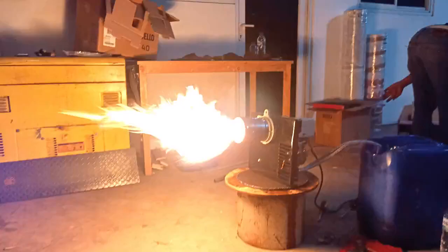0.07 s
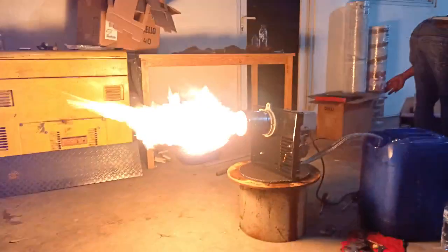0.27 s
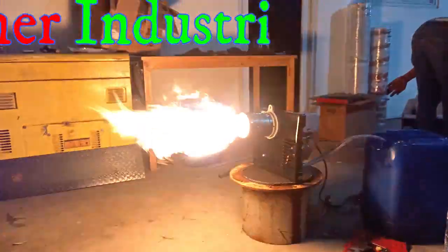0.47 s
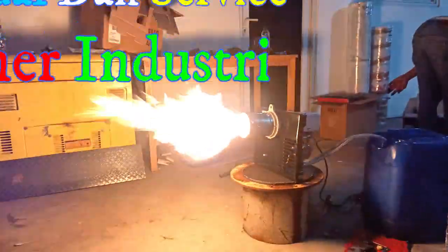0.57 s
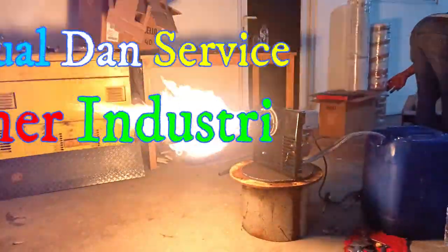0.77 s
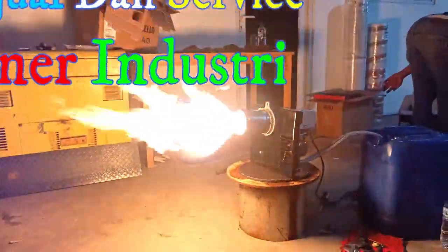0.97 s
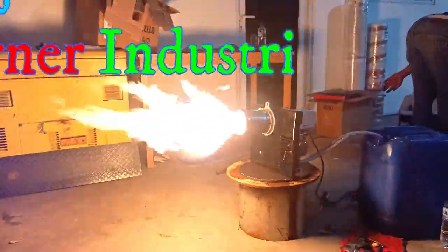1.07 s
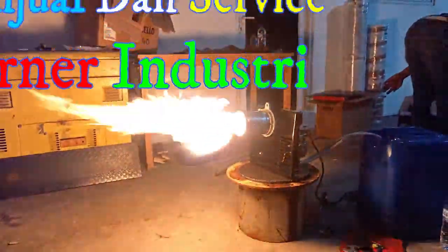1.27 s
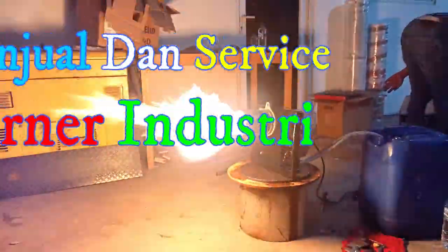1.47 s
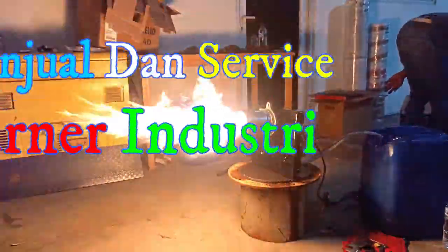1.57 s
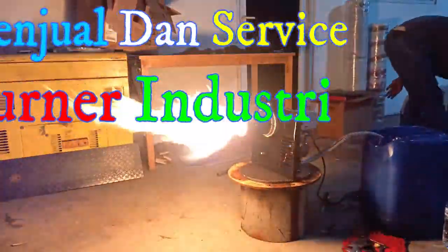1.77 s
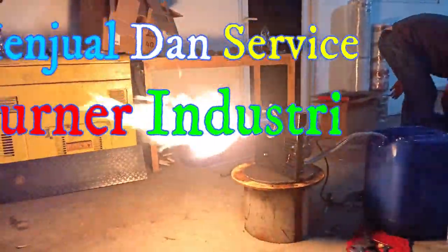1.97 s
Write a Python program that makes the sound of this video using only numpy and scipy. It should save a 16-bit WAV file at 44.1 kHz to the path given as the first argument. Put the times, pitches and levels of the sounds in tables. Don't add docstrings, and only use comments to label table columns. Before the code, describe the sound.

An oil burner roars into open air in a workshop. Silence until about 0.1 s, then the sound fades in, near full by 0.5 s, and creeps slightly louder until cutting off at 2 s. Deep combustion rumble dominates, with a low howl wandering in pitch and uneven surges, notably around 0.95 and 1.15 s. Rough mid-range flame noise, diffuse fan air, soft hiss and faint wavering machine tones fill in behind, with short room reverberation and dulled highs.

```python
import sys
import numpy as np
from scipy import signal
from scipy.fft import rfft, irfft
from scipy.io import wavfile
from scipy.ndimage import uniform_filter1d

SR = 44100
rng = np.random.default_rng(int(sys.argv[2]) if len(sys.argv) > 2 else 0)


def wrap_up_sound(samples):
    columns = np.atleast_2d(samples).T
    tamed = np.clip(columns, -1, 1)
    steps = np.round(tamed * 32767).astype(np.int16)
    wavfile.write(sys.argv[1], SR, steps)


def gain_from_db(level_db):
    decades = np.asarray(level_db, float) / 20
    return 10 ** decades


N = 89214


def evened(x):
    return x / np.sqrt(np.mean(x ** 2) + 1e-20)


def read(points, hz):
    f, value = np.transpose(points)
    return np.interp(np.log(hz + 1), np.log(f + 1), value)


def bump(hz, centre_hz, width_hz):
    return 1 / (1 + (2 * (hz - centre_hz) / width_hz) ** 2)


def lumps(table, hz):
    return sum(db * np.exp(-(2 * (hz - f) / w) ** 2) for f, w, db in table)


def shaped(x, gain):
    return irfft(rfft(x, N) * gain(np.fft.rfftfreq(N, 1 / SR)), N)


def delayed(hz, seconds):
    return np.exp(-2j * np.pi * hz * seconds)


def turbulence(size, channels, patch_db, flicker_db):
    hop = size // 4
    frames, bins = N // hop + 5, size // 2 + 1
    real, imaginary = rng.standard_normal((2, channels, bins, frames))
    patches = uniform_filter1d(rng.standard_normal((frames, bins)), size=10, axis=0)
    patches = evened(uniform_filter1d(patches, size=6, axis=1)).T
    flicker = evened(uniform_filter1d(rng.standard_normal(frames), size=3))
    z = (real + 1j * imaginary) * gain_from_db(patch_db * patches + flicker_db * flicker)
    return signal.istft(z, nperseg=size, noverlap=size - hop)[1][:, :N]


STEADY_S, STEADY_SHARE = 0.14, 0.8


def steadied(x):
    span = int(STEADY_S * SR / 2)
    power = uniform_filter1d(uniform_filter1d(evened(x) ** 2, span), span)
    return evened(x / (power + 0.058) ** (STEADY_SHARE / 2))


# time in seconds, swell in dB.
FLAME_SWELL = [(.12, -4), (.3, 2), (.42, 0.5), (.54, 1), (.6, -1.5), (.76, 1), (.8, 0), (0.891, -1),
               (.95, 2.5), (1.07, -2.5), (1.14, 2), (1.298, -0.5), (1.418, 0.5), (1.58, 0), (1.721, 0.5),
               (1.801, -1.5), (1.87, 0.5), (2.0, -1.5)]


def swell(share):
    s, db = np.transpose(FLAME_SWELL)
    return gain_from_db(share * np.interp(np.arange(N) / SR, s, db))


ROOM_T60_S, ROOM_DB = 0.37, -3.5


def room(x):
    t = np.arange(SR // 2) / SR
    taps = rng.standard_normal((2, len(t))) * gain_from_db(-60 * t / ROOM_T60_S)
    taps = taps * (t > 0.004)
    tail = gain_from_db(ROOM_DB) * rfft(taps / np.linalg.norm(taps[0]), N)
    return shaped(x, lambda hz: 1 + tail)


# frequency in Hz, level in dB rms.
FAN_TONES = [(485.5, -38), (511.5, -41), (527, -43), (1439, -47), (1514.5, -40), (1773, -52), (2439, -52),
             (2993, -55)]
TONE_WIDTH_HZ, TONE_LR_DB = 7.9, 6.5


def tones():
    out, t = np.zeros(N), np.arange(N) / SR
    for hz, db in FAN_TONES:
        drift = shaped(rng.standard_normal((2, N)), lambda f: bump(f, 0, TONE_WIDTH_HZ))
        level = gain_from_db(db + 3.8 * evened(drift[0]))
        phase = 2 * np.pi * hz * t + 1.14 * evened(drift[1])
        out += level * np.sqrt(2) * np.sin(phase)
    return out * gain_from_db(np.array([[TONE_LR_DB / 2], [-TONE_LR_DB / 2]]))


# frequency in Hz, density in dB per Hz.
RUSH_LEFT_PORT = [(90, -29), (170, -11.5), (450, 0), (800, -10), (2200, -4), (4000, -25.5), (5000, -19),
                  (16000, -29)]
# frequency in Hz, density in dB per Hz.
RUSH_RIGHT_PORT = [(90, -28), (170, 0), (450, -5.5), (800, -10.5), (2200, -0.5), (4000, -10.5), (5000, -22),
                   (16000, -27.5)]
# centre in Hz, width in Hz, lift in dB.
SCATTER_LUMPS = [(251, 30, -6), (350, 20, 7.5), (442, 60, 4.5), (515, 26, 1), (1014, 280, 5),
                 (1280, 230, 1.5), (1620, 170, -3), (2240, 69, -6.5), (2760, 240, -2)]
RUSH_DB, RUSH_FOLLOW = -26.5, 0.033


def rush():
    def colour(hz):
        ports = np.array([read(RUSH_LEFT_PORT, hz), read(RUSH_RIGHT_PORT, hz)])
        return gain_from_db(ports + lumps(SCATTER_LUMPS, hz))

    air = turbulence(size=256, channels=2, patch_db=1.3, flicker_db=-0.2)
    return gain_from_db(RUSH_DB) * swell(RUSH_FOLLOW) * evened(room(shaped(air, colour)))


# frequency in Hz, density in dB per Hz.
JET_SPECTRUM = [(150, -2), (350, -2), (700, 0), (1400, -8), (2500, -16.5), (4000, -14), (5000, -33),
                (9000, -31)]
# frequency in Hz, left minus right in dB.
JET_LR_DB = [(300, -4), (700, 1.5), (1200, -5.5), (3300, -2), (6000, -9)]
# centre in Hz, width in Hz, lift in dB.
JET_LUMPS = [(656, 33, 2.5), (853, 210, 2), (1054, 156, 4), (1203, 104, -16), (1420, 67, 0.5),
             (1586, 110, -0.5), (1746, 40, 8), (1930, 52, 7.5), (2396, 150, 5), (2630, 110, -15),
             (3036, 410, 5), (4010, 390, 1)]
ROAR_DB, ROAR_FOLLOW = -23.5, 0.18
BOUNCE_S, BOUNCE_SHARE = 0.001345, 0.25
LEFT_EARLY_S = 0.00004


def roar():
    def colour(hz):
        bounce = 1 + BOUNCE_SHARE * delayed(hz, BOUNCE_S)
        return gain_from_db(read(JET_SPECTRUM, hz) + lumps(JET_LUMPS, hz)) * bounce

    jet = turbulence(size=512, channels=1, patch_db=1.0, flicker_db=-0.5)[0]
    jet = evened(shaped(jet, colour))
    left = shaped(jet, lambda hz: gain_from_db(read(JET_LR_DB, hz) / 2) * delayed(hz, -LEFT_EARLY_S))
    right = shaped(jet, lambda hz: gain_from_db(-read(JET_LR_DB, hz) / 2))
    return gain_from_db(ROAR_DB) * swell(ROAR_FOLLOW) * np.array([left, right])


# time in seconds, frequency in Hz.
HOWL_PITCH = [(.15, 190), (.3, 174.5), (0.531, 219.2), (0.681, 215.3), (.8, 195), (.95, 198.4), (1.17, 175),
              (1.301, 169.6), (1.4, 212.1), (1.549, 195), (1.68, 222), (1.781, 224), (1.849, 172.3),
              (1.92, 168.9), (2.02, 209.7)]
HOWL_WIDTH_HZ, HOWL_DB, HOWL_FOLLOW = 34, -21.5, 2.2


def howl():
    s, hz = np.transpose(HOWL_PITCH)
    phase = 2 * np.pi * np.cumsum(np.interp(np.arange(N) / SR, s, hz)) / SR
    a, b = shaped(rng.standard_normal((2, N)), lambda f: bump(f, 0, HOWL_WIDTH_HZ))
    resonance = a * np.cos(phase) + b * np.sin(phase)
    return gain_from_db(HOWL_DB) * swell(HOWL_FOLLOW) * steadied(resonance)


# frequency in Hz, density in dB per Hz.
PUFF_SPECTRUM = [(20, -30), (40, -18.5), (70, -3), (110, -5), (135, -6), (250, -6), (330, -11),
                 (500, -44.5)]
# frequency in Hz, width in Hz, lift in dB.
LOW_MODES = [(100.4, 56, 4.5), (171, 17.3, 8.5), (199, 8.9, 5), (224, 38, 8), (271.5, 14, 1),
             (296.6, 10.4, 4.5), (338.3, 12.3, 4.5), (362, 12, 3)]
RUMBLE_DB, RUMBLE_FOLLOW = -17.5, 0.82


def rumble():
    def colour(hz):
        modes = sum(db * bump(hz, f, w) for f, w, db in LOW_MODES)
        return gain_from_db(read(PUFF_SPECTRUM, hz) + modes)

    puffs = shaped(turbulence(size=2048, channels=1, patch_db=0.26, flicker_db=0.83), colour)
    return gain_from_db(RUMBLE_DB) * swell(RUMBLE_FOLLOW) * steadied(puffs)


def scene():
    return tones() + rush() + roar() + howl() + rumble()


def top_cut(x):
    return signal.sosfilt(signal.butter(12, 15780, fs=SR, output="sos"), x)


# centre in Hz, width in Hz, left lift in dB, right lift in dB.
PORT_CAVITIES = [(5140, 350, -8, -2.5), (6870, 1190, 7.5, 9.5), (7790, 1520, 4.5, 3.5),
                 (11640, 4540, -9, -7.5), (15800, 4200, -33, 0.5)]
EDGE_HZ = 15780
START_S, OPEN_S, CLOSE_S = 0.086, 0.0058, 0.001
STEP_DB, FADE_S, FADE_BEND, CREEP_DB_PER_S = -25.5, 0.28, 1.22, 2


def record(dry):
    def port_response(hz):
        lifts = [lumps([(f, w, db[port]) for f, w, *db in PORT_CAVITIES], hz) for port in (0, 1)]
        return gain_from_db(lifts) * (hz < EDGE_HZ)

    t = np.arange(N) / SR - START_S
    rise = np.tanh((np.maximum(t, 0) / FADE_S) ** FADE_BEND)
    gain = (gain_from_db(STEP_DB) + rise) * np.clip(t / OPEN_S, 0, 1)
    gain = gain * np.clip((t[-1] - t) / CLOSE_S, 0, 1) * gain_from_db(CREEP_DB_PER_S * (t - 1))
    return top_cut(shaped(dry, port_response) * gain)


dry = scene()
out = record(dry)
wrap_up_sound(out)
```